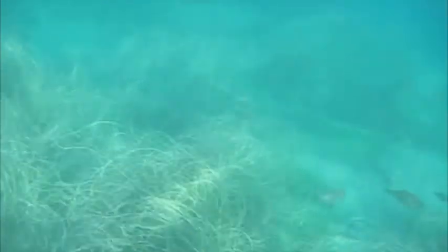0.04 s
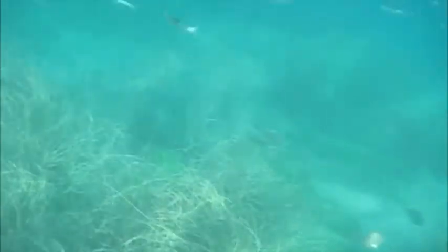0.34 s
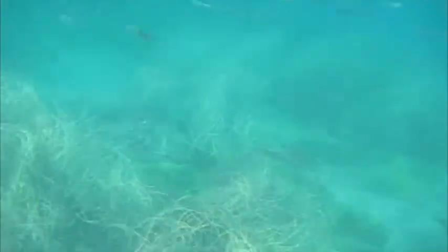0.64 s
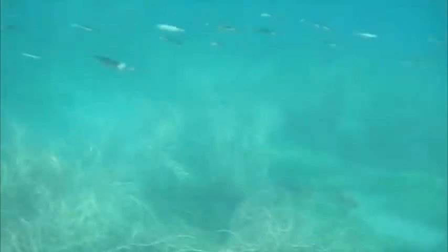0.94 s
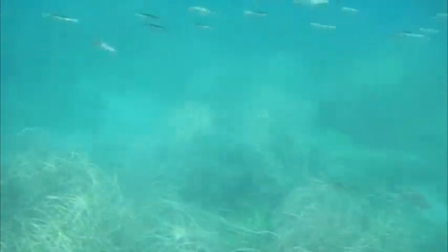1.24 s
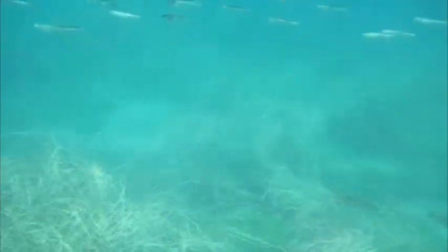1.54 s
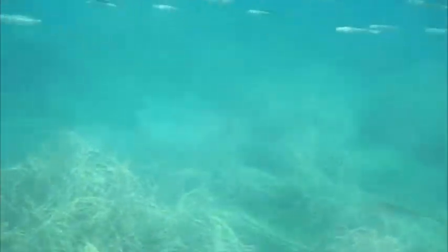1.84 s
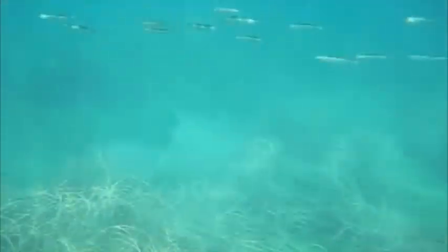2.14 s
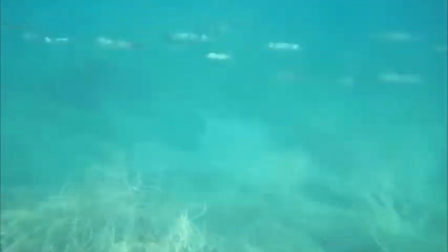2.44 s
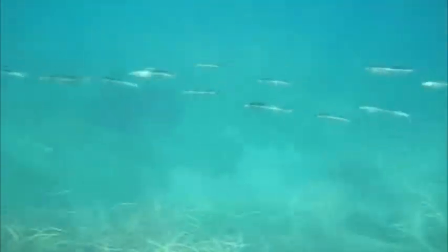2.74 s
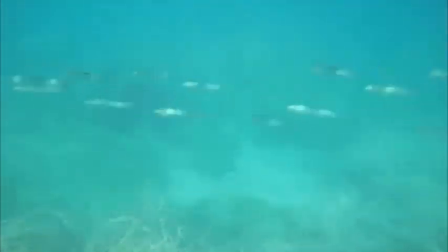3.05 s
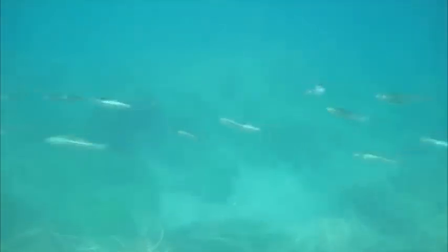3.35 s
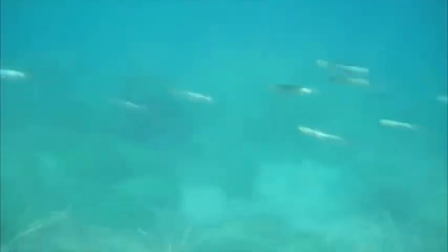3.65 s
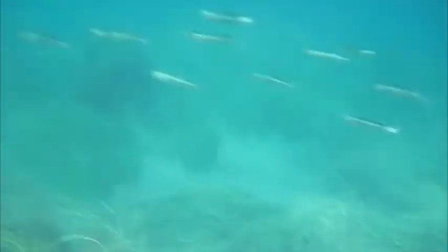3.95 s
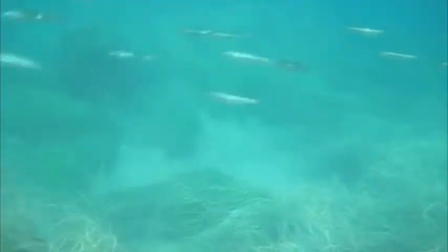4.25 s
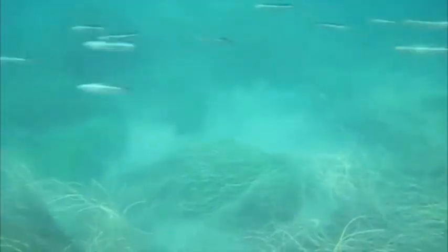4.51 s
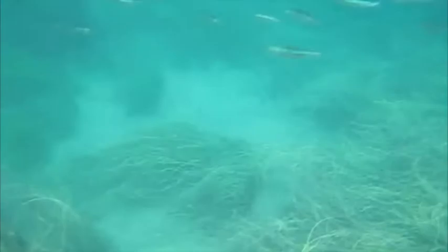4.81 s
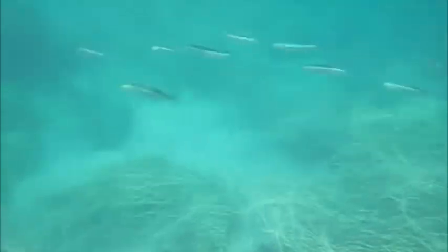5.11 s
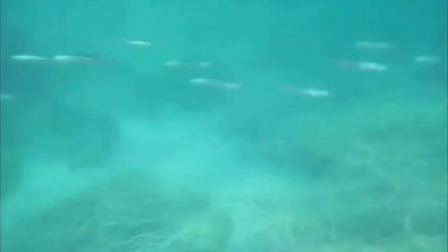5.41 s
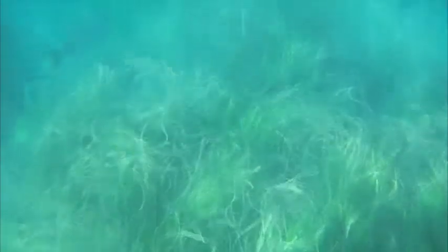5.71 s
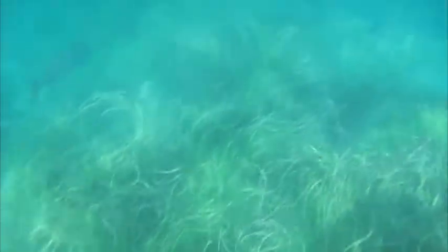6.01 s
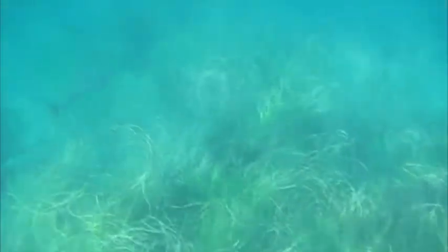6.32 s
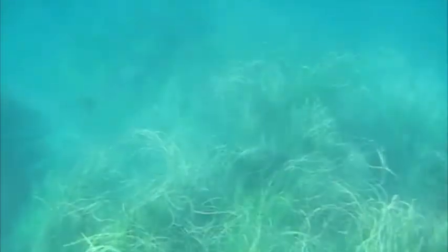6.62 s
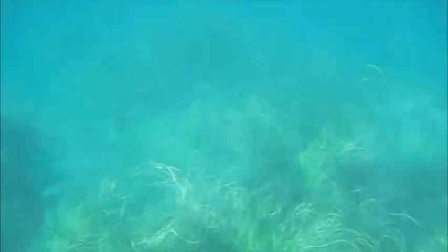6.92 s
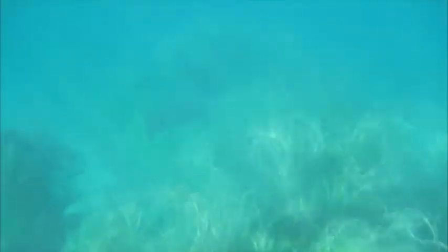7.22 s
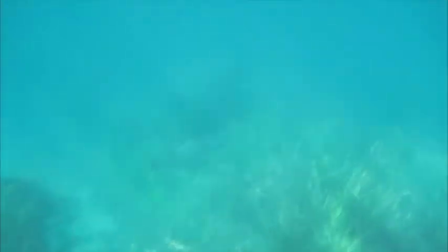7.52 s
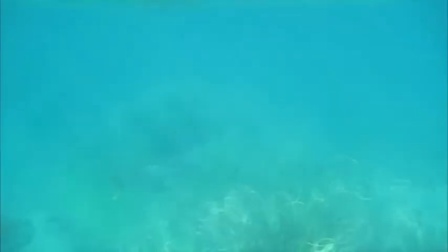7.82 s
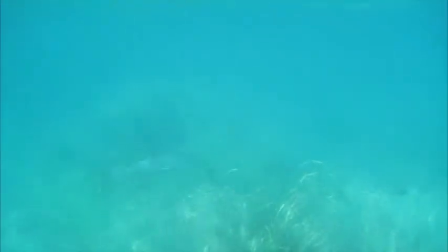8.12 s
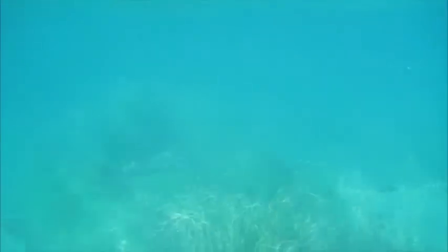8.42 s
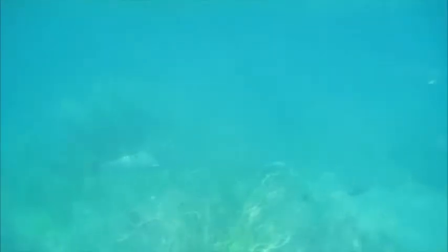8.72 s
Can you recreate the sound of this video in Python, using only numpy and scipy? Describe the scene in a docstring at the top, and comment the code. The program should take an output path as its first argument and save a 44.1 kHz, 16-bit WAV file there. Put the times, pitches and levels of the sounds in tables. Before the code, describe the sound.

Underwater over a seagrass bed, heard from inside a camera's waterproof case. Passing water makes a hollow, fluttering hum that swells and ebbs in uneven surges. Shrimp crackle faintly throughout, with single sharp snaps close by. Bubbles gulp, ping and rustle, mostly in the first half, over a steady hiss and thin whine. Just past halfway the sound drops out briefly, then the hum and snaps return.

```python
"""A hollow hum near 610 Hz swells and ebbs under the sharp snaps and crackle of shrimp.
The microphone sits inside a camera's waterproof case, drifting over a seagrass bed. Water surging
past makes the air in the case hum; shrimp, near and far, snap and ring its shell. Bubbles gulp,
ping and rustle, and behind it all lie the camera's own hiss and thin whine.
At about 5.5 s the sound drops out briefly and fades back in."""
import sys
import numpy as np
from scipy import signal
from scipy.fft import rfft, irfft
from scipy.io import wavfile
from scipy.ndimage import uniform_filter1d

SR = 44100
rng = np.random.default_rng(int(sys.argv[2]) if len(sys.argv) > 2 else 0)


def transcribe(signal):
    """Save signal, clipped to [-1, 1], as a 16-bit WAV file at the path in sys.argv[1]."""
    frames = np.atleast_2d(signal).T
    limited = np.clip(frames, -1, 1)
    pcm = np.round(limited * 32767).astype(np.int16)
    wavfile.write(sys.argv[1], SR, pcm)


N = 390726
TIME = np.arange(N) / SR


def case_hum(flutter_db=1.96, flutter_hz=16, flow_db=-43, flow_follow=0.64):
    """Eddies buffet the case; the air around the microphone rings at its own notes and throbs."""
    # resonances of the air in the case: f/Hz, width/Hz, relative level/dB
    air_modes = [(593.3, 63, -3), (632.7, 42, -2), (492, 61, -25.5), (403.6, 28, -24), (249, 86, -22.5),
                 (101.7, 11, -27.5), (1707, 19, -29.5)]
    # spectrum of the turbulent flow: f/Hz, relative level/dB
    flow_spectrum = [(25, -10.5), (60, -11.5), (110, -7), (200, 4), (300, -3.5), (480, 9.5), (750, -9.5),
                     (950, -15), (1600, -12.5), (3000, -54), (8000, -38)]
    surge_db = surge_level()
    flutter = amp(flutter_db * wander(flutter_hz))
    air = unit(sum(amp(db) * band(rng.standard_normal(N), hz, width) for hz, width, db in air_modes))
    air /= np.sqrt(uniform_filter1d(air ** 2, size=3000) + 1e-6)  # the slow swell is left to the surge
    flow = noise(flow_spectrum) * amp(flow_db + flow_follow * (surge_db - surge_db.max()))
    return (air * amp(surge_db) + flow) * flutter


def surge_level(calm_db=-61.5, ebb_db_per_s=79.5):
    """Each surge of water builds, holds and ebbs back to calm; gives the hum's slow swell in dB."""
    # surges along the case: t/s at full strength, hold/s, level/dB, build-up/(dB/s)
    surges = [(0.0, 0.42, -44.5, 80), (0.392, 0.52, -40.5, 60), (0.95, 0.36, -46.5, 80),
              (1.781, 0.042, -29.5, 92), (2.017, 0.11, -29, 48), (2.38, 0.3, -38.5, 84),
              (3.796, 0.12, -35.5, 62), (4.088, 0.058, -39.5, 152), (4.589, 0.13, -28, 218),
              (4.699, 0.13, -27.5, 150), (5.871, 0.026, -36.5, 90), (6.018, 0.023, -33.5, 152),
              (6.293, 0.11, -49.5, 82), (7.35, 0.56, -47.5, 42), (8.484, 0.2, -37, 81)]
    power = amp(calm_db) ** 2
    for s, hold, db, build in surges:
        below_db = build * np.maximum(s - TIME, 0) + ebb_db_per_s * np.maximum(TIME - s - hold, 0)
        power = power + amp(db - below_db) ** 2
    return 10 * np.log10(power)


def near_snaps(treble_trim_db=-1):
    """Shrimp snap close to the case, each standing out singly; one dull bubble ping falls among them."""
    # close shrimp snaps, and one dull bubble ping at 8.36 s:
    # t/s, level/dB, favoured f/Hz, treble over body/dB before the trim
    strikes = [(0.238, -39, 3400, -4), (0.4263, -39, 2800, -6), (0.6448, -34.5, 3230, -14),
               (0.7544, -43.5, 2240, -7), (0.9335, -36.5, 2900, 0), (1.093, -39.5, 2350, -16),
               (0.802, -43.5, 4100, -7), (1.064, -43, 2900, -6), (1.34, -41.5, 2380, -12),
               (1.373, -42.5, 3000, 7), (1.5764, -41, 2760, -5), (1.859, -39.5, 3600, -7),
               (1.9938, -39.5, 2830, -12), (2.123, -33, 3300, -14), (2.197, -40.5, 2660, -16),
               (2.575, -21, 3060, -10.5), (3.1574, -44, 3430, -13), (3.858, -36.5, 2060, -8),
               (3.8762, -40, 2730, -6), (4.5437, -38.5, 3460, -1), (4.5518, -39, 4130, -15),
               (4.9128, -44, 2460, -7), (5.1163, -44, 3780, -1), (5.413, -31.5, 2960, -6.5),
               (5.6803, -36.5, 2980, -11), (5.8816, -38.5, 2900, -6), (5.902, -35.5, 3420, -12),
               (5.981, -43, 3420, 1), (6.2957, -40, 2900, -12), (6.5902, -37.5, 3400, -5.5),
               (6.79, -41, 3280, -7), (7.1361, -29.5, 3570, -5), (7.8343, -36, 2600, -9),
               (7.9658, -22, 2200, -17.5), (8.288, -29.5, 2590, -17), (8.3395, -40.5, 2250, -8),
               (8.3578, -33.5, 2460, -36), (8.4043, -43.5, 2930, -15), (8.4473, -44, 2940, -4),
               (8.708, -32, 3020, 3.5), (8.854, -24.5, 2770, -19)]
    out = np.zeros(N)
    for s, db, hz, treble_db in strikes:
        add(out, s, amp(db) * snap(hz, treble_db + treble_trim_db))
    return out


def snap(hz, treble_db, echo_gain=0.82, scatter_s=0.0016, tail_s=0.009, crack_db=-17):
    """A collapsing bubble: one spike, one echo and scatter from the seabed, all ringing the shell."""
    t = np.arange(2048) / SR
    scatter = rng.standard_normal(len(t)) * (0.17 * np.exp(-t / scatter_s) + 0.046 * np.exp(-t / tail_s))
    echo_at = int(SR * rng.uniform(.0008, .0022))
    pressure = scatter + (t == 0) + echo_gain * (t == t[echo_at])
    ring = shell(pressure)
    top_hz = np.clip(5400 * 2 ** (treble_db / 36), 2000, 6000)  # a dull snap has a duller body too
    body = signal.sosfilt(signal.butter(2, [1300, top_hz], "band", fs=SR, output="sos"), ring)
    body = band(body, hz, width=1400) + 0.36 * body  # each snap favours its own pitch
    treble = signal.sosfilt(signal.butter(4, 5500, "high", fs=SR, output="sos"), ring)
    crack = band(pressure, hz=1830, width=1100)  # the dull part that comes straight through the wall
    sound = unit(body) + amp(treble_db) * unit(treble) + amp(crack_db) * unit(crack)
    return sound / np.sqrt(np.mean(sound[:220] ** 2))  # rms 1 over the first 5 ms


def shell(pressure):
    """The wall of the case rings at its modes when a pressure pulse strikes it."""
    # modes of the shell: f/Hz, width/Hz, gain/dB
    modes = [(1740, 300, -6), (2250, 122, 1.5), (2830, 213, -2), (3300, 110, -6.5), (4250, 350, 0),
             (5800, 200, -5.5), (6300, 350, -7), (7620, 270, -5), (9700, 560, -14), (12200, 180, -11),
             (13600, 6200, -18.5)]
    return sum(amp(db) * resonate(pressure, hz, width) * (-1) ** k
               for k, (hz, width, db) in enumerate(modes))


def stray_shrimp(level_db=-46, middle_hz=3100, crowding=1.5, count=34):
    """Shrimp at middle distance snap now and then, each with its own strength and colour."""
    out = np.zeros(N)
    for k, (jitter, size, colour, brightness) in enumerate(rng.uniform(-1, 1, (count, 4))):
        share = ((k + 1 + jitter) / count) ** crowding  # above 1, the snaps crowd towards the start
        sound = snap(middle_hz * np.exp(.3 * colour), treble_db=-6 + 8 * brightness)
        add(out, share * N / SR, amp(level_db + 2 * size) * sound)
    return out


def pings_and_gulps(onset_s=0.00038, rise=0.015, churn=0.43):
    """Small bubbles and one snap's high edge ping briefly; large bubbles swell, churn and rise a little."""
    # small bubble pings, and the bright high edge of one shrimp snap at 7.14 s: t/s, level/dB, f/Hz, t60/s
    pings = [(.1, -30.5, 11200, .01), (.971, -32.5, 5780, 0.013), (1.671, -36, 2260, 0.041),
             (1.859, -31, 3360, 0.062), (1.883, -29, 3160, 0.021), (2.0277, -24, 6300, 0.0076),
             (3.7475, -29, 11400, 0.006), (3.7541, -24, 2860, 0.023), (3.8003, -28.5, 2390, .016),
             (3.858, -24, 11050, 0.0085), (4.424, -33.5, 2890, 0.017), (4.596, -30.5, 6400, .013),
             (4.7442, -32, 4600, 0.013), (7.1368, -19, 14200, .006)]
    # large bubbles gulping against the case: t/s, level/dB, starting f/Hz, time to peak/s
    gulps = [(.3095, -21, 590, .003), (.3825, -24, 601, 0.0048), (0.3821, -25, 450, 0.0025),
             (.476, -42.5, 1460, 0.0047), (.531, -34.5, 827, .0058), (.659, -37, 362, 0.0074),
             (1.535, -37, 116, 0.0061), (1.548, -30, 154, 0.01), (2.194, -41.5, 1410, 0.0036),
             (3.15, -36, 181, 0.012), (4.207, -21, 254, .009), (4.269, -30.5, 260, 0.01),
             (4.689, -32.5, 1260, 0.0032), (4.706, -27, 384, 0.0033), (4.709, -34.5, 1350, .002),
             (4.722, -36, 1920, .004), (4.741, -30, 850, .0016), (4.743, -39, 1560, 0.0038)]
    out, t = np.zeros(N), np.arange(SR // 8) / SR
    for s, db, hz, t60 in pings:
        onset = 1 - np.exp(-t / onset_s)
        add(out, s, amp(db) * onset * ping(t, hz, t60))
    for s, db, hz, peak_s in gulps:
        age = t / peak_s
        swell = (age * np.exp(1 - age)) ** 1.1
        cycles = np.cumsum(hz * (1 + rise * np.minimum(age, 6))) / SR
        swirl = unit(band(rng.standard_normal(len(t)), hz, width=0.29 * hz))
        add(out, s, amp(db) * swell * (np.sin(2 * np.pi * cycles) + churn * swirl))
    return out


def ping(t, hz, t60):
    """A ring at one pitch, falling 60 dB in t60 seconds."""
    return np.exp(-np.log(1000) * t / t60) * np.sin(2 * np.pi * hz * t)


def rustles():
    """Crowds of tiny pops and eddies swell and fade, each crowd about its own pitch."""
    # water rustling and rumbling along the case: middle t/s, length/s, level/dB, f/Hz, width/Hz
    crowds = [(0.39, 0.84, -54, 2300, 810), (1.23, .9, -56, 2530, 1100), (2.06, 0.76, -53, 2100, 1500),
              (1.4, 0.9, -55.5, 1500, 1300), (3.03, 0.32, -49.5, 2300, 340), (3.12, 0.79, -59, 1400, 890),
              (1.9, 0.67, -51.5, 111, 21), (2.85, 0.3, -52, 270, 120), (0.55, 0.8, -52, 182, 150),
              (4.72, .094, -39, 180, 150)]
    out = np.zeros(N)
    for s, length, db, hz, width in crowds:
        pops = impulses(per_s=700, spread_db=-1.5, cap_db=10) * rng.choice([-1, 1], N)
        swell = np.cos(np.pi * np.clip((TIME - s) / length, -.5, .5))
        out += amp(db) * swell * unit(band(pops, hz, width))
    return out


def tiny_bubbles(per_s=16, level_db=-48, count=20):
    """Specks of gas leave the seagrass; each pings once at the pitch of its size."""
    out, t = np.zeros(N), np.arange(1024) / SR
    for hz in np.geomspace(2100, 7000, count):
        releases = impulses(per_s / count, spread_db=3, cap_db=8)
        out += signal.oaconvolve(releases, ping(t, hz, t60=0.018))[:N]
    return amp(level_db) * out


def far_shrimp(per_s=90, level_db=-59, middle_hz=2900, count=24):
    """A colony further off: many faint snaps of every colour merge into crackle."""
    out = np.zeros(N)
    for _ in range(count):
        strikes = impulses(per_s / count, spread_db=3, cap_db=10)
        colour, brightness = rng.standard_normal(2)
        sound = snap(middle_hz * np.exp(0.2 * colour), treble_db=-4 + 5 * brightness)
        out += signal.oaconvolve(strikes, sound)[:N]
    return amp(level_db) * out


def sea_wash():
    """Even in calm water the wash of the sea keeps the air and walls of the case sounding faintly."""
    # resonances of the case: f/Hz, width/Hz, rms level/dB
    modes = [(258.3, 48, -61.5), (2280, 920, -75.5), (3000, 570, -71), (5814, 540, -66.5),
             (9440, 230, -76.5), (10830, 1100, -65.5)]
    return sum(amp(db) * unit(band(rng.standard_normal(N), hz, width)) for hz, width, db in modes)


def electronics(hiss_db=-49, frames_per_s=30):
    """The camera's self-noise: hiss, a thin whine that restarts at the frame rate, and faint tones."""
    # spectrum of the steady hiss: f/Hz, relative level/dB
    hiss_spectrum = [(25, -4.5), (130, 1.5), (260, -0.5), (430, -0.5), (900, -6), (1800, -9), (2800, -9),
                     (5000, -12), (6200, -13), (8500, -15.5), (11000, -20), (12100, -19), (13900, -8.5),
                     (15800, -12.5)]
    # the whine, a tone and its octave: f/Hz, rms level/dB
    whine_partials = [(7568.5, -62.8), (15137, -60.9)]
    # fainter, steady tones: f/Hz, rms level/dB
    steady_tones = [(7853, -78), (11351, -78), (15734, -75)]
    frame_time = (TIME + rng.random()) % (1 / frames_per_s)
    whine = sum(amp(db) * np.sin(2 * np.pi * hz * frame_time) for hz, db in whine_partials)
    tones = sum(amp(db) * np.sin(2 * np.pi * hz * TIME) for hz, db in steady_tones)
    return amp(hiss_db) * noise(hiss_spectrum) + np.sqrt(2) * (whine + tones)


def amp(db):
    """Decibels to gain."""
    return 10 ** (np.asarray(db) / 20)


def unit(x):
    """Scales to an rms of 1."""
    return x / np.sqrt(np.mean(x ** 2) + 1e-20)


def add(mix, s, sound):
    """Mixes a sound in at time s."""
    part = mix[max(round(s * SR), 0):][:len(sound)]
    part += sound[:len(part)]


def impulses(per_s, spread_db, cap_db):
    """Spikes at random times, their levels spread exponentially from 0 dB."""
    sizes = amp(np.minimum(spread_db * rng.exponential(1, N), cap_db))
    return sizes * (rng.random(N) < per_s / SR)


def noise(spectrum):
    """Noise of rms 1, shaped by points of f/Hz, relative level/dB."""
    hz, db = np.transpose(spectrum)
    f = np.fft.rfftfreq(N, 1 / SR)
    gain = amp(np.interp(np.log(f + 1), np.log(hz), db))
    return unit(irfft(rfft(rng.standard_normal(N)) * gain, N))


def wander(hz):
    """A slow random curve of rms 1 that rolls off above hz."""
    f = np.fft.rfftfreq(N, 1 / SR)
    return unit(irfft(rfft(rng.standard_normal(N)) * np.exp(-(f / hz) ** 2), N))


def resonate(x, hz, width):
    """One resonance of gain 1, its width in Hz."""
    return signal.lfilter(*signal.iirpeak(min(hz, .45 * SR), hz / width, SR), x)


def band(x, hz, width):
    """The same resonance twice over, for steeper skirts."""
    return resonate(resonate(x, hz, width), hz, width)


def scene():
    """Everything reaches one microphone inside the case."""
    water = case_hum() + sea_wash() + rustles() + pings_and_gulps() + tiny_bubbles()
    return (water + near_snaps() + far_shrimp() + electronics() + stray_shrimp())[None]


def record(dry, gap_start_s=5.468, gap_end_s=5.578, gap_db=-43.5, fade_in_s=.105, cutoff_hz=15880):
    """The sound drops out briefly and fades back in; a steep low-pass takes off the highest treble."""
    recovery = np.clip((TIME - gap_end_s) / fade_in_s, amp(gap_db), 1)
    heard = dry * np.where(TIME < gap_start_s, 1, recovery)
    low_pass = signal.firwin(511, cutoff_hz, window=("kaiser", 9), fs=SR)
    return signal.oaconvolve(heard, low_pass[None], "same")


dry = scene()
out = record(dry)
transcribe(out)
```